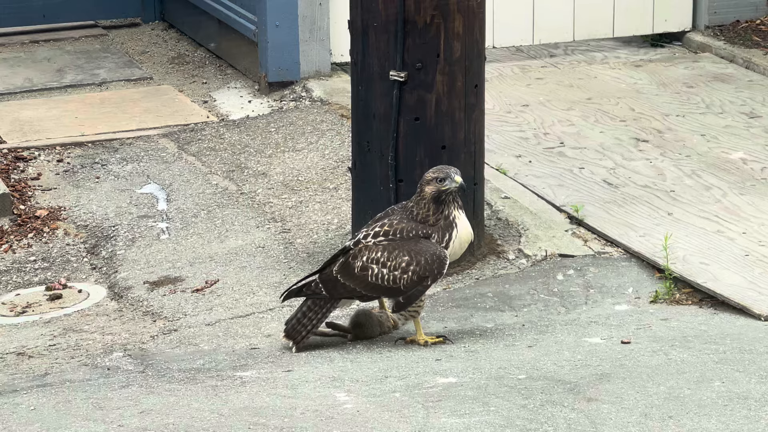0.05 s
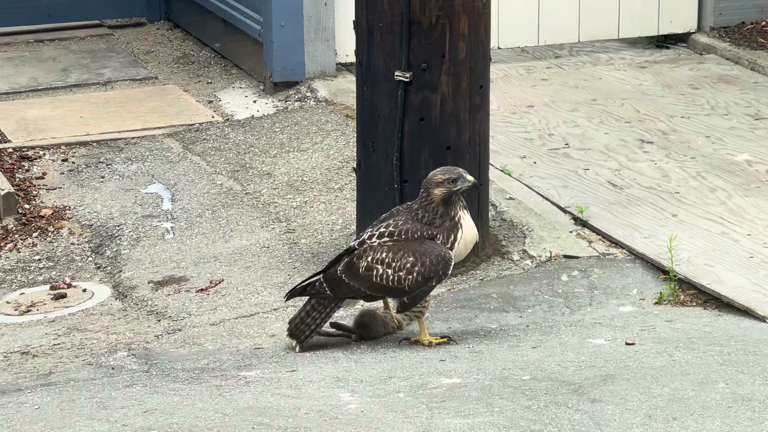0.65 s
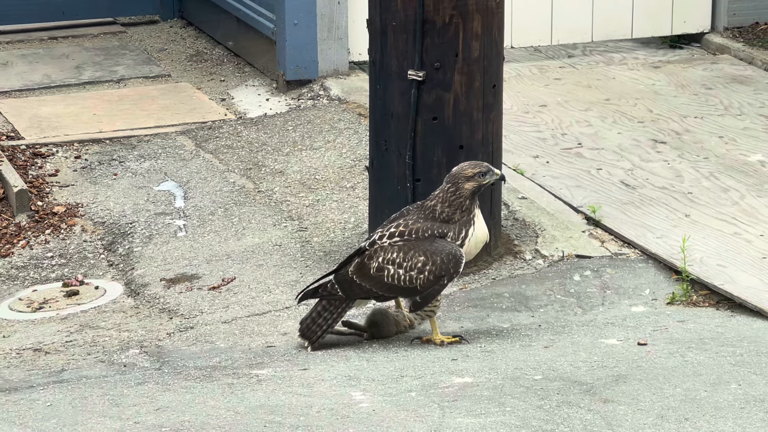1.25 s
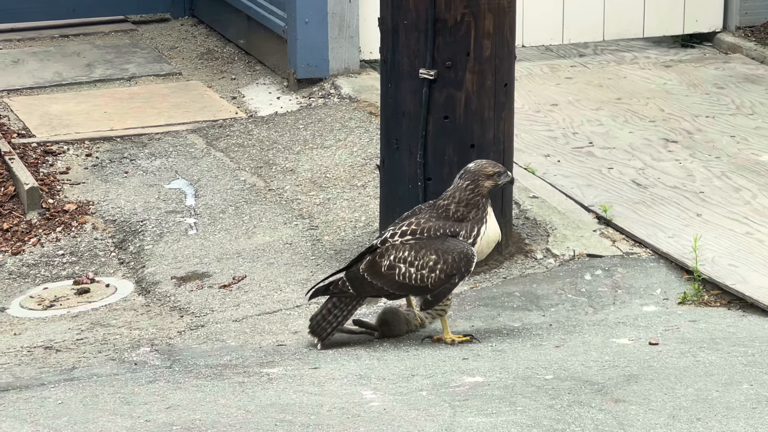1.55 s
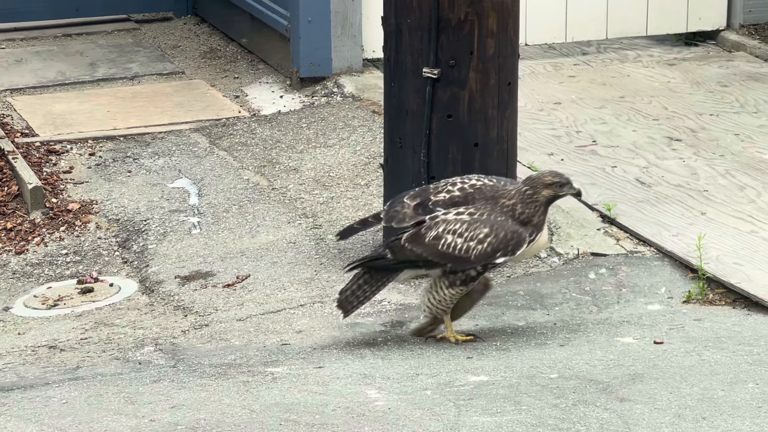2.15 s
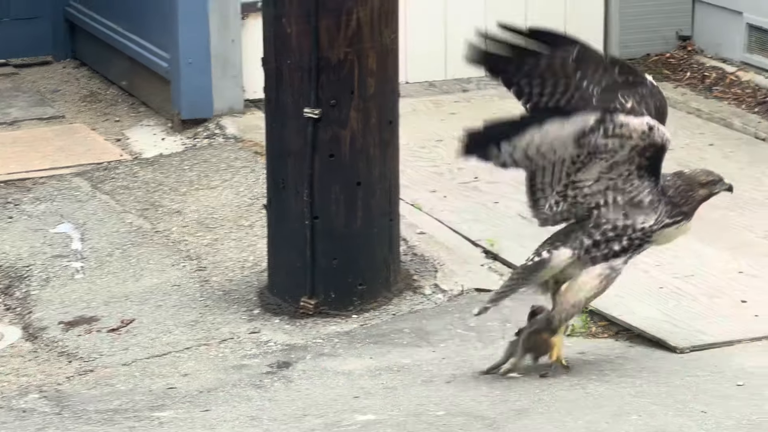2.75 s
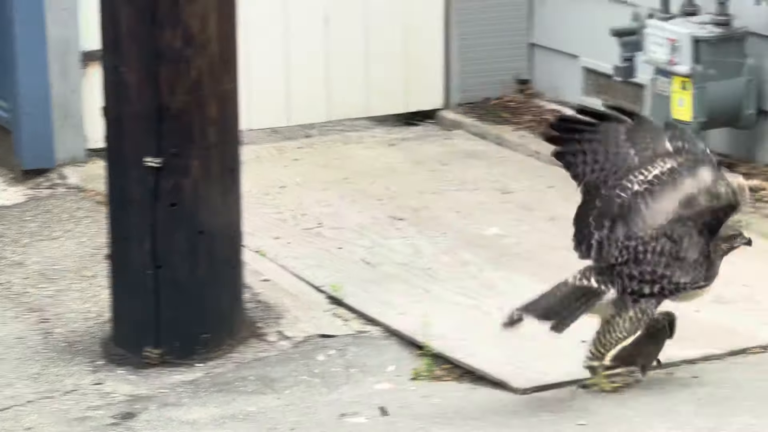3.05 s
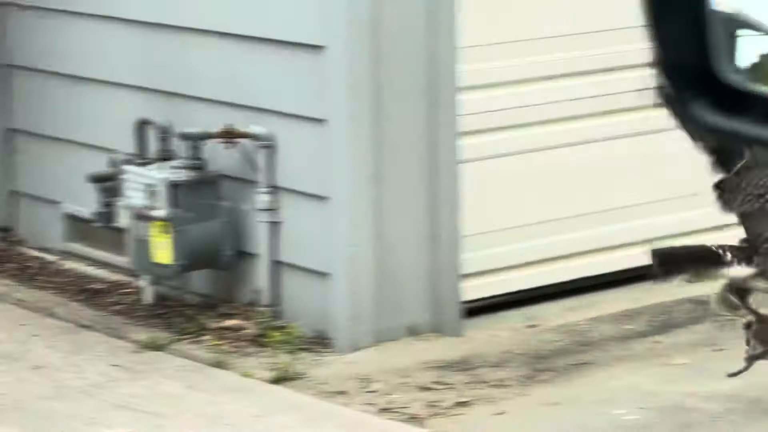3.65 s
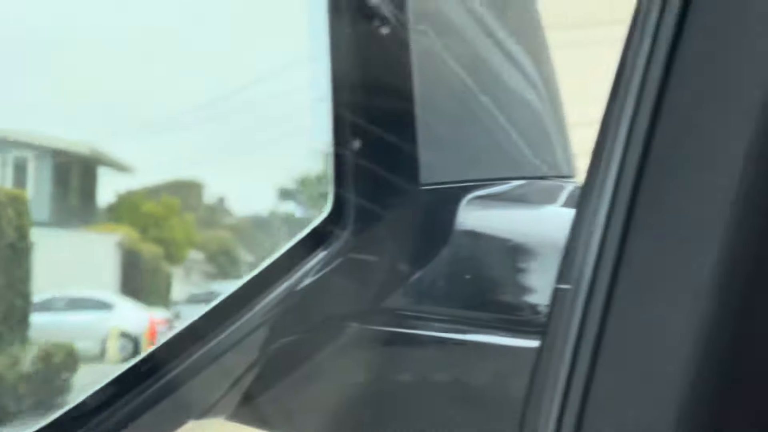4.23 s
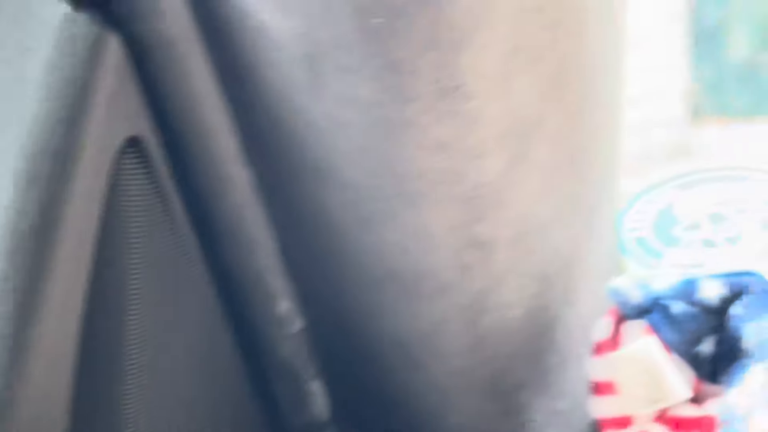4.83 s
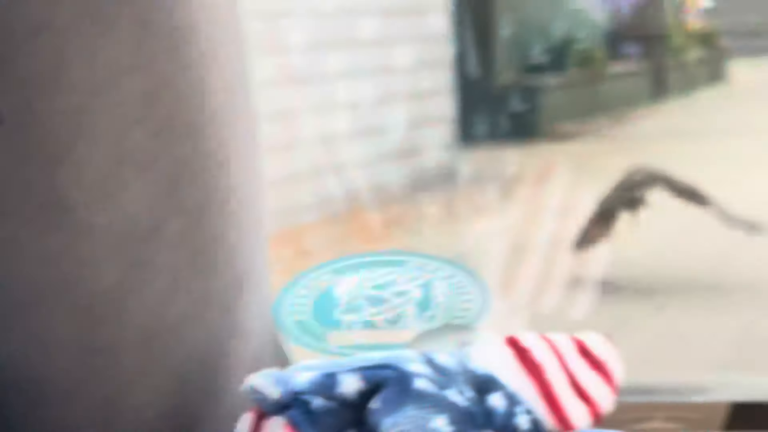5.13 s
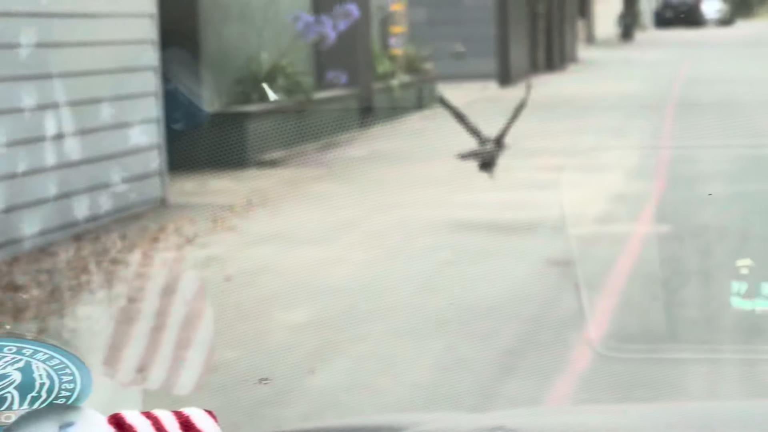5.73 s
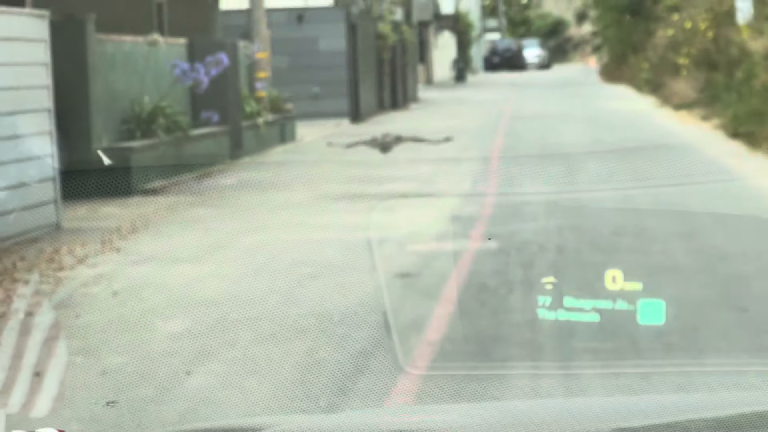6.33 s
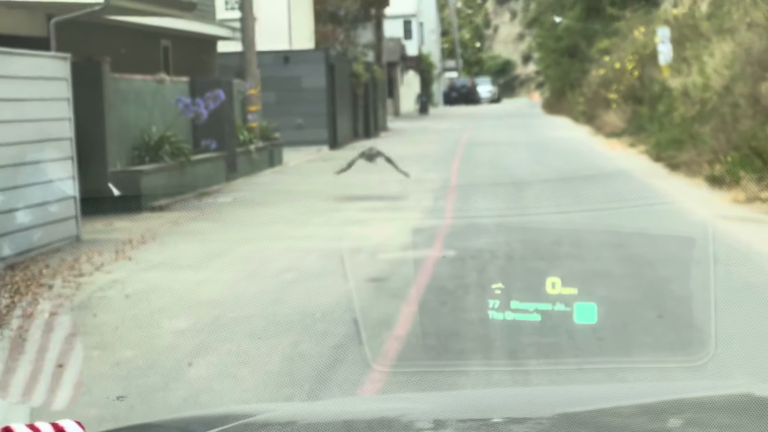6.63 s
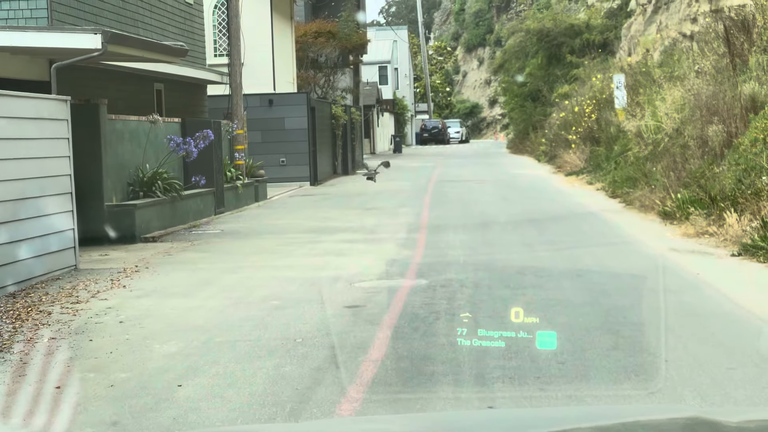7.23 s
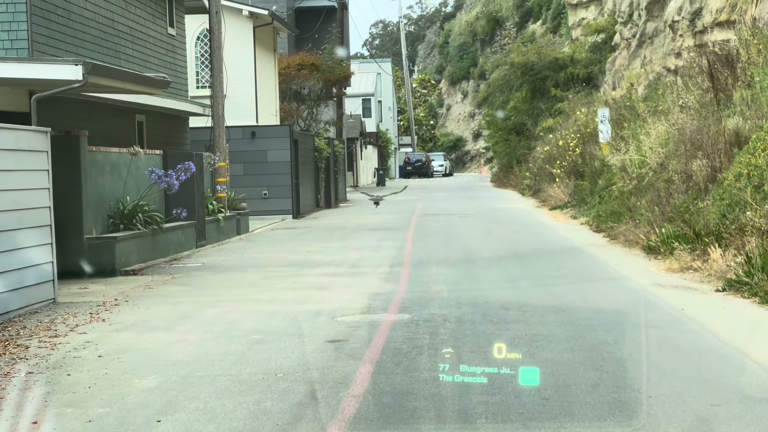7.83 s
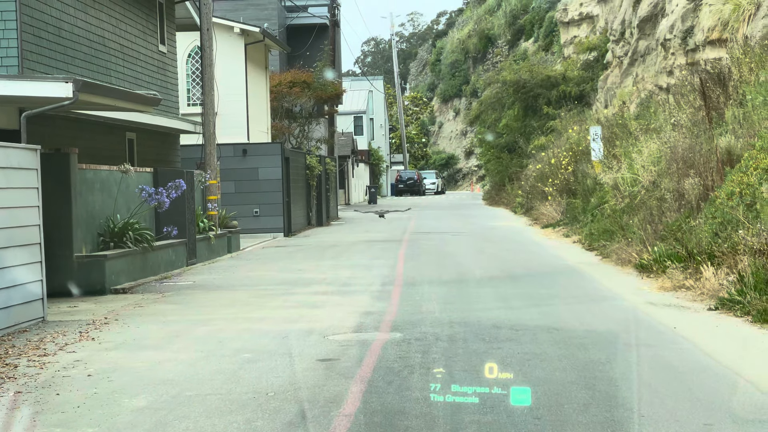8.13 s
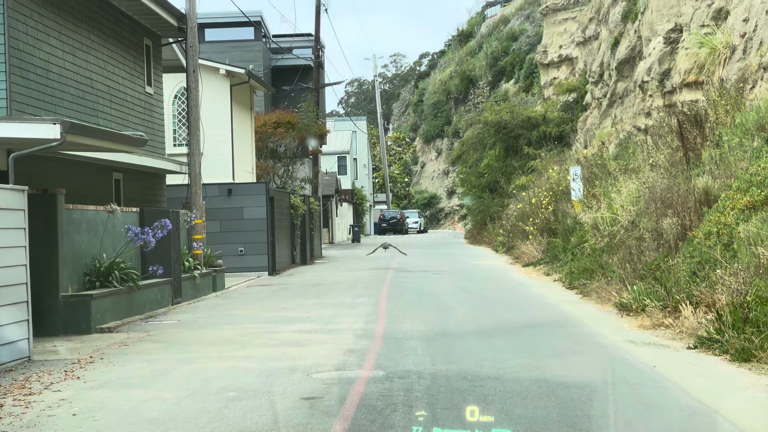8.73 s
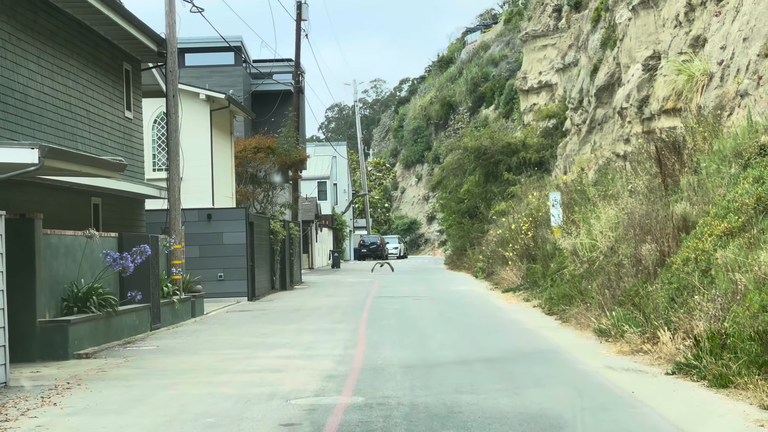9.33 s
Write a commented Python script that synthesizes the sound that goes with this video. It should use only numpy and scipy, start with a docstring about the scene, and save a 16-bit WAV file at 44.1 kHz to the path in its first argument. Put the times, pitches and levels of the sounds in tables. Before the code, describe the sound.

Heard from a phone at an open car window, the engine idles with a deep throb, along with a light fan whir, small ticks and very faint chirps in the street. The throb eases and a hawk takes off, barely audible. Fingers knock and rub on the phone and cloth slides along the door as it moves inside, where street air gives way to an even rush of ventilation and a subdued rumble.

```python
"""Idling car, street to cabin

An eight-cylinder car idles in a quiet lane. A phone at the open side window is drawn inside and
turned to the windscreen. Uneven firings ring the exhaust, louder outside; street air gives way to
ventilation. Faint ticks, chirps and the wings of a hawk taking off come from the street. As the
phone moves, fingers knock and rub on its case and a sleeve slides along the door."""
import sys
import numpy as np
from scipy import signal
from scipy.fft import rfft, irfft, next_fast_len
from scipy.io import wavfile
from scipy.ndimage import uniform_filter1d, map_coordinates

SR = 44100
rng = np.random.default_rng(int(sys.argv[2]) if len(sys.argv) > 2 else 0)


def wrap_up_sound(samples):
    """Save the sound to the file named by the first command line argument, as 16-bit audio."""
    columns = np.atleast_2d(samples).T
    # keep every value between -1 and 1, then stretch to whole-number steps
    tamed = np.clip(columns, -1, 1)
    steps = np.round(tamed * 32767).astype(np.int16)
    wavfile.write(sys.argv[1], SR, steps)


N = 418068

# Phone path. Each row: time in seconds, share inside (0 street, 0.5 window opening, 1 cabin).
PHONE_PATH = [(2.45, 0), (2.9, 0.02), (3.6, 0.26), (4.3, 0.89), (5.6, 0.94), (9.48, 1)]
# Stereo image of the noise. Each row: frequency in Hz, left-right correlation.
CORRELATION = [(60, 0.97), (160, 0.94), (300, 0.93), (600, 0.62), (1100, .52), (2100, 1), (3200, 0.8),
               (5500, 1), (12000, 0.93)]
# Noise spectra. Each row: frequency in Hz, relative level in dB.
STREET_SPECTRUM = [(190, -28), (330, -10), (362, -10), (509, -2), (580, -6.5), (691, -8), (758, -4.5),
                   (823, -12.5), (895, -11), (1190, -27.5), (1260, -18.5), (1540, -29), (3000, -47),
                   (3900, -74), (6600, -120)]
CABIN_SPECTRUM = [(190, -34), (330, -6.5), (471, -8), (541, -0.5), (597, -1), (803, -7), (913, -14),
                  (998, -13), (1170, -19.5), (1380, -19), (1510, -24.5), (2070, -32), (3500, -54),
                  (4550, -74), (7700, -120)]
HISS_SPECTRUM = [(1200, -28), (2500, 3.5), (5000, 0), (7000, 2), (9000, 0.5), (10300, 8), (12000, 1),
                 (13000, -16)]
FEATHER_SPECTRUM = [(1800, -12), (3000, -6), (4200, -1), (5500, -4), (9000, -3)]
SLEEVE_SPECTRUM = [(700, -7), (1500, 7.5), (2300, 7.5), (3400, 3), (4500, 1), (6000, -1.5), (9000, 2.5),
                   (11500, 1), (12800, -27)]
SEAT_SPECTRUM = [(1200, 1), (1800, -1.5), (2500, -4.5), (3300, -13), (6000, -17)]
RUMBLE_SPECTRUM = [(8.8, -46.5), (15, -15), (71, 5), (82, 2.5), (122, -6), (152, -3.5), (184, -15.5),
                   (220, -23.5), (290, -52), (480, -120)]
BURBLE_SPECTRUM = [(100, -37), (160, -0.5), (220, -1.5), (310, -3), (400, -15.5), (600, -17), (1200, -42.5)]
# Levels by phone position. Each holds: level outside, gain inside, gain in the opening, all in dB.
AIR_LEVELS_DB = (-62.5, 0.33, 2.25)
HISS_LEVELS_DB = (-87.5, 0.5, 5.5)
# Whines of the electrics. Each row: frequency in Hz, level in dB.
WHINE_TONES = [(6961, -105), (8786, -106), (9157, -107), (9523, -109), (11208, -109)]
# Bird calls. Each row: start and length in seconds, first and last pitch in Hz, level in dB.
BIRD_CHIRPS = [(0.086, 0.051, 4120, 3630, -86), (0.12, 0.046, 3990, 4280, -87),
               (1.026, 0.064, 2770, 2620, -86), (1.725, .05, 4000, 3990, -86),
               (1.773, 0.13, 2800, 2550, -87), (1.989, 0.031, 3800, 3650, -88),
               (6.097, 0.049, 3050, 3250, -86)]
# Street ticks. Each row: start in seconds, level in dB, centre of the excited range in Hz,
# its width in octaves, T60 in seconds, relative crack level in dB.
STREET_TICKS = [(0.603, -73, 3700, 0.45, 0.033, -12), (.644, -70, 3900, .35, 0.034, -12),
                (.801, -59, 1800, .6, 0.11, -20), (.871, -58.5, 2940, 0.95, 0.039, -5.5),
                (.895, -76, 7500, .8, .03, -3), (.949, -63, 2700, 0.76, 0.049, -2.5),
                (0.967, -67, 3400, 0.74, 0.04, -8), (.984, -79, 4030, .5, .03, -8),
                (1.279, -64.5, 8920, .6, 0.026, -6.5), (1.308, -70, 9200, .5, .018, -4),
                (1.38, -75.5, 2011, .6, 0.22, -15), (1.411, -70.5, 7790, 0.32, 0.025, -5),
                (1.682, -74, 12000, .3, .02, -10), (1.859, -70, 2103, 0.74, 0.08, -12),
                (1.873, -52.5, 1750, 0.83, 0.063, -19), (1.897, -70, 1750, .8, 0.07, -18)]
# Resonances of the ticks. Each row: frequency in Hz, relative level in dB.
TICK_RESONANCES = [(1560, 4), (1830, -0.5), (2280, -4), (2800, -13), (3450, -9), (4150, -3), (6900, -9),
                   (8100, -5), (9350, 1), (11500, -8)]
# Smooth swells. Each row: start in seconds, length in seconds, level in dB.
WING_BEATS = [(2.81, 0.22, -86), (3.1, 0.13, -88)]
SLEEVE_SQUEAKS = [(3.55, 0.2, -86), (4.68, 0.34, -86)]
SEAT_SHIFTS = [(5.42, 0.49, -77.5), (5.855, 0.21, -78.5), (6.12, 0.21, -81), (7.09, 0.12, -92),
               (7.97, 0.1, -83), (8.2, 0.41, -87)]
HAND_BUMPS = [(2.98, 0.13, -47.5), (3.61, 0.18, -49.5), (4.01, .1, -48.5), (4.285, 0.077, -47),
              (8.22, 0.11, -54.5)]
# Sleeve on the door. Each row: start, rise, hold and release in seconds, level and treble lift in dB.
SLEEVE_STROKES = [(3.535, .045, 0.06, 0.12, -76.5, 5.5), (3.64, 0.2, 0.17, 0.55, -75.5, -0.5),
                  (4.55, 0.4, .28, .1, -72, -0.5), (4.98, 0.055, 0.02, 0.18, -83, 4.5)]
# Fingers rubbing the case. Each row: start in seconds, length in seconds, level in dB.
FINGER_RUBS = [(3.158, 0.024, -53), (3.646, 0.064, -48.5), (3.659, 0.014, -50.5), (4.808, 0.054, -51),
               (4.875, 0.068, -51.5), (5.503, 0.038, -49.5)]
# Knocks on the case. Each row: start in seconds, level in dB, pitch in Hz, pitch overshoot as a share.
FINGER_KNOCKS = [(3.1528, -33.5, 540, 0.2), (3.664, -42, 700, 0.3), (3.8935, -44, 300, 0.4),
                 (4.270, -42, 560, 0.2), (4.3547, -28, 584, 0.76), (5.524, -45, 800, 0.4),
                 (5.5443, -31, 470, 0.55), (6.005, -45, 620, 0.4)]
# Resonances of the gripped case, and of the exhaust and car body.
# Each row: frequency in Hz, relative level in dB, T60 in seconds.
CASE_MODES = [(300, -10, 0.014), (520, -2, 0.016), (630, 0, 0.018), (770, -5, 0.012), (960, -13, 0.01)]
EXHAUST_MODES = [(34.8, -20.5, 0.15), (48, -9.5, 0.39), (69.4, 2, 0.14), (103.4, -9.5, 0.16),
                 (145, -18, 0.052)]
# One engine cycle. Each entry: firing strength in dB. Two thump where one bank fires twice running.
FIRINGS_DB = [-11, 0.5, -8.5, -6.5, -2.5, -9.5, 1, -19]
# Engine rumble envelope. Each row: time in seconds, level in dB.
RUMBLE_ENVELOPE = [(0, -42.5), (.8, -44.5), (1.22, -41), (1.39, -49.5), (1.95, -51.5), (2.08, -46.5),
                   (2.33, -46), (2.41, -57), (5.7, -55), (7.5, -57.5), (8.8, -60.5), (9.48, -56.5)]


def amp(db):
    """Decibels to gain."""
    return 10 ** (np.asarray(db) / 20)


def unit(x):
    """Scale to rms 1."""
    return x / np.sqrt(np.mean(x ** 2) + 1e-20)


def sine(hz):
    """Sine of peak 1 from a per-sample frequency."""
    return np.sin(2 * np.pi * np.cumsum(hz) / SR)


def over_hz(rows, hz):
    """Interpolate (Hz, value) rows on a log axis."""
    knots_hz, values = np.transpose(rows)
    return np.interp(np.log(hz + 1), np.log(knots_hz + 1), values)


def over_time(rows):
    """Interpolate (seconds, value) rows per sample."""
    return np.interp(np.arange(N) / SR, *np.transpose(rows))


def wobble(rate_hz):
    """Smooth random curve through Gaussian knots."""
    knots = rng.standard_normal(int(N * rate_hz / SR) + 4)
    coarse = np.arange(0, N, 32)
    return np.interp(np.arange(N), coarse, map_coordinates(knots, [coarse * rate_hz / SR]))


def add(track, start_s, sound):
    """Mix a sound into a track."""
    part = track[max(round(start_s * SR), 0):][:len(sound)]
    part += sound[:len(part)]


def swells(rows):
    """Gain curve, one Hann swell per row."""
    gain = np.zeros(N)
    for start_s, length_s, db in rows:
        add(gain, start_s, amp(db) * np.hanning(round(length_s * SR)))
    return gain


def filtered(x, response):
    """Apply a frequency response by FFT."""
    size = next_fast_len(N + 8192)
    return irfft(rfft(x, size) * response(np.fft.rfftfreq(size, 1 / SR)), size)[..., :N]


def stereo_noise(gain):
    """Partly correlated noise pair, rms 1, shaped by gain(hz)."""
    def mid_side(hz):
        angle = np.arccos(np.clip(over_hz(CORRELATION, hz), -1, 1)) / 2
        return gain(hz) * np.array([np.cos(angle), np.sin(angle)])
    mid, side = filtered(rng.standard_normal((2, N)), mid_side)
    return unit(np.array([mid + side, mid - side]))


def coloured(spectrum, patchy_db):
    """Stereo noise, rms 1, steep beyond the spectrum's ends, with drifting patches of gain."""
    def gain(hz):
        skirts = np.minimum(hz / spectrum[0][0], 1) ** 2 / np.maximum(hz / spectrum[-1][0], 1) ** 4
        return amp(over_hz(spectrum, hz)) * skirts
    pair = stereo_noise(gain)
    if not patchy_db:
        return pair
    frames = signal.stft(pair, nperseg=512)[2]
    patches = uniform_filter1d(rng.standard_normal(frames.shape[1:]), size=4, axis=0)
    patches = unit(uniform_filter1d(patches, size=9, axis=1))
    return unit(signal.istft(frames * amp(patchy_db * patches), nperseg=512)[1][:, :N])


def narrow(centre_hz, half_width_hz):
    """Stereo noise in one resonance."""
    return stereo_noise(lambda hz: 1 / (1 + ((hz - centre_hz) / half_width_hz) ** 2))


def phone_position():
    """Share inside the car and nearness to the window opening, both 0-1."""
    inside = np.clip(over_time(PHONE_PATH), 0, 1)
    return inside, 2 * np.sqrt(inside * (1 - inside))


def air(inside, opening):
    """Street air crossfades to ventilation under a thin hiss; both peak in the window opening."""
    def level_db(outside_db, inside_db, opening_db):
        return outside_db + inside_db * inside + opening_db * opening
    street = np.sqrt(1 - inside) * coloured(STREET_SPECTRUM, patchy_db=2.0)
    cabin = np.sqrt(inside) * coloured(CABIN_SPECTRUM, patchy_db=1.8)
    flow_db = level_db(*AIR_LEVELS_DB) + 0.37 * wobble(6.9) + 0.59 * wobble(70)
    hiss = amp(level_db(*HISS_LEVELS_DB)) * coloured(HISS_SPECTRUM, patchy_db=1.0)
    return amp(flow_db) * (street + cabin) + hiss


def electrics():
    """The car's electrics whine: faint, slightly unsteady high tones."""
    return sum(amp(db + 1.7 * wobble(2.7)) * np.sqrt(2) * sine(hz + 2.5 * wobble(8))
               for hz, db in WHINE_TONES)


def radiator_fan(inside, blade_hz=750, outside_db=-69):
    """Wavering blade tone and three noise bands, heard outside."""
    blade = np.sqrt(2) * sine(blade_hz * (1 + 0.005 * wobble(12)))
    blade *= amp(-1 + 1.4 * wobble(3.3))
    whir = amp(-12) * narrow(blade_hz, 16) + amp(-16) * narrow(1290, 31) + amp(-19) * narrow(1545, 40)
    return amp(outside_db) * (1 - inside) * (blade + whir)


def vent(inside, level_db=-79):
    """An air vent whistles, heard only well inside."""
    return amp(level_db) * inside ** 5 * narrow(1384, 50)


def window_hollow(opening, level_db=-65.5):
    """Hollow resonance of the window opening."""
    return amp(level_db) * opening * narrow(614, 65)


def birds(warble_share=0.015):
    """Distant chirps: short, gliding, warbling whistles."""
    track = np.zeros(N)
    for start_s, length_s, first_hz, last_hz, db in BIRD_CHIRPS:
        n = round(length_s * SR)
        pitch_hz = np.linspace(first_hz, last_hz, n) * (1 + warble_share * wobble(400)[:n])
        add(track, start_s, amp(db) * np.hanning(n) * sine(pitch_hz))
    return track


def hawk():
    """Take-off: one swell of feather noise per wing beat."""
    return swells(WING_BEATS) * coloured(FEATHER_SPECTRUM, patchy_db=5)[0]


def ticks(crack_t60_s=0.027, rise_s=0.0014, rattle_db=3, detune_share=0.04):
    """Small dry contacts ring clusters of close modes, which rattle as they die under a brief crack."""
    t = np.arange(SR // 5) / SR
    track = np.zeros(N)
    mode_hz, mode_db = np.repeat(TICK_RESONANCES, 5, axis=0).T[:, :, None]
    for start_s, db, centre_hz, width_octaves, t60_s, crack_db in STREET_TICKS:
        detune, phase = rng.standard_normal((2, len(mode_hz), 1))
        detuned_hz = mode_hz * np.exp(detune_share * detune)
        weight = amp(mode_db) * np.exp(-(np.log2(mode_hz / centre_hz) / width_octaves) ** 2)
        ring = unit((weight * np.sin(2 * np.pi * (detuned_hz * t + phase))).sum(axis=0))
        crack = amp(crack_db - 60 * t / crack_t60_s) * rng.standard_normal(len(t))
        tick = (ring * amp(-60 * t / t60_s) + crack) * (1 - np.exp(-t / rise_s))
        add(track, start_s, amp(db) * tick / np.abs(tick).max())
    return track * amp(rattle_db * wobble(160))


def lane_reverb(x, t60_s=0.16, wet_db=-8):
    """House walls add a short tail."""
    t = np.arange(SR // 2) / SR
    tail = rng.standard_normal(len(t)) * amp(-60 * t / t60_s)
    return x + amp(wet_db) * signal.fftconvolve(x, tail / np.linalg.norm(tail))[:N]


def clothing(grip_db=1.1, treble_hz=4200, squeak_hz=4800):
    """A sleeve drags with uneven grip and thin squeaks, brighter when quick; cloth shifts on the seat."""
    t = np.arange(N) / SR
    cloth = amp(grip_db * wobble(22)) * coloured(SLEEVE_SPECTRUM, patchy_db=2.0)
    treble = filtered(cloth, lambda hz: 1 - 1 / (1 + (hz / treble_hz) ** 4))
    strokes = np.zeros((2, N))
    for start_s, rise_s, hold_s, release_s, db, lift_db in SLEEVE_STROKES:
        envelope = np.interp(t, start_s + np.cumsum([0, rise_s, hold_s, release_s]), [0, 1, 1, 0])
        strokes += amp(db) * envelope * (cloth + (amp(lift_db) - 1) * treble)
    seat = swells(SEAT_SHIFTS) * amp(grip_db * wobble(35)) * coloured(SEAT_SPECTRUM, patchy_db=1.5)
    squeaks = swells(SLEEVE_SQUEAKS) * narrow(squeak_hz, 280)
    return strokes + squeaks + seat


def hand_bumps(thud_hz=78.2, wander_share=0.134):
    """The turning hand bumps the phone: low, dull thuds."""
    return swells(HAND_BUMPS) * np.sqrt(2) * sine(thud_hz * (1 + wander_share * wobble(45)))


def finger_rubs(slip_rate_hz=190, unevenness=0.35, scatter_db=0.5, edge_s=0.0027):
    """Skin sticks and slips at an uneven rate; each slip rings the hollow case."""
    t = np.arange(SR // 5) / SR
    grip, slips = np.zeros(N), np.zeros(N)
    for start_s, length_s, db in FINGER_RUBS:
        add(grip, start_s, amp(db) * np.clip(np.minimum(t, length_s - t + edge_s) / edge_s, 0, 1))
    gap, size = rng.standard_normal((int(2 * slip_rate_hz * N / SR), 2)).T
    onsets = (np.cumsum(np.exp(unevenness * gap)) * SR / slip_rate_hz).astype(int)
    slips[onsets[onsets < N]] = amp(scatter_db * size[onsets < N])
    ring = sum((-1) ** k * amp(db - 60 * t / t60_s) * np.cos(2 * np.pi * hz * t)
               for k, (hz, db, t60_s) in enumerate(CASE_MODES))
    band = lambda hz: 1 / (1 + (hz / 1100) ** 8) / (1 + (180 / (hz + 1)) ** 4)
    return grip * unit(filtered(signal.fftconvolve(slips, ring)[:N], band))


def finger_knocks(t60_s=0.006, rise_s=0.0015, settle_s=0.0012, thud_ratio=0.694, thud_rise_s=0.0024):
    """Each knock: a damped ring of the case, falling in pitch, over a slower, lower thud."""
    t = np.arange(SR // 5) / SR
    track = np.zeros(N)
    for start_s, db, hz, overshoot in FINGER_KNOCKS:
        ring = sine(hz * (1 + overshoot * np.exp(-t / settle_s))) * amp(-60 * t / t60_s)
        thud = np.sin(2 * np.pi * thud_ratio * hz * t) * amp(-8 - 30 * t / t60_s)
        knock = ring * (1 - np.exp(-(t / rise_s) ** 2)) + thud * (1 - np.exp(-(t / thud_rise_s) ** 2))
        add(track, start_s, amp(db) * knock / np.abs(knock).max())
    return track


def through_case(x, lag_s=0.00014, pan_db=1.0, cutoff_hz=1300):
    """The case carries contact sound to both ports, low-passed; the left is louder and later."""
    ports = np.array([[0.5], [-0.5]])
    delay = lambda hz: np.exp(-2j * np.pi * hz * lag_s * ports)
    return amp(pan_db * ports) * filtered(x, lambda hz: delay(hz) / (1 + (hz / cutoff_hz) ** 10))


def firing_train(cycle_hz=4.342, first_s=0.0012, jitter_s=0.0004, scatter_db=0.05):
    """One impulse per firing, eight unequal ones per four-stroke cycle."""
    firing_hz = cycle_hz * len(FIRINGS_DB)
    track = np.zeros(N)
    for k, (size, jitter) in enumerate(rng.standard_normal((int(N / SR * firing_hz), 2))):
        db = FIRINGS_DB[k % len(FIRINGS_DB)] - scatter_db * size
        add(track, first_s + k / firing_hz + jitter_s * jitter, amp([db]))
    return track


def engine(inside, accessory_hz=156.6, puff_s=0.024, burble_outside_db=-59.5, shield_db=6):
    """Firings ring the exhaust; their gas puffs modulate rumble and burble. An accessory hums."""
    firings = firing_train()
    t = np.arange(SR // 2) / SR
    ring = -sum(amp(db - 60 * t / t60_s) * np.sin(2 * np.pi * hz * t) for hz, db, t60_s in EXHAUST_MODES)
    band = lambda hz: 1 / (1 + (25 / (hz + 1)) ** 8) / (1 + (hz / 190) ** 6)
    beat = unit(filtered(signal.fftconvolve(firings, ring)[:N], band))
    puffs = unit(signal.fftconvolve(firings, np.hanning(round(puff_s * SR)))[:N])
    rumble = unit((1 + 0.17 * puffs) * coloured(RUMBLE_SPECTRUM, patchy_db=0))
    burble = unit((1 + 0.2 * puffs) * coloured(BURBLE_SPECTRUM, patchy_db=1.0))
    hum = amp(wobble(7.1)) * sine(accessory_hz + 1.3 * wobble(4))
    rumble_db = over_time(RUMBLE_ENVELOPE)
    burble_db = burble_outside_db + 0.47 * (rumble_db - rumble_db.mean()) - shield_db * inside
    return amp(rumble_db) * (amp(-2) * beat + rumble) + amp(burble_db) * burble + amp(-65) * hum


def scene():
    """Sum at the phone's two microphones."""
    inside, opening = phone_position()
    idle = engine(inside)
    background = air(inside, opening) + radiator_fan(inside) + vent(inside)
    background += window_hollow(opening) + electrics()
    handling = clothing() + through_case(finger_knocks() + finger_rubs()) + hand_bumps()
    street = lane_reverb(ticks() + birds() + hawk())
    return background + street + handling + idle


def record(dry, flip_hz=10250, flip_half_width_hz=1700, top_hz=12900):
    """The phone's channels fall out of phase in one treble band; all above top_hz is cut."""
    def response(hz):
        offset = np.clip((hz - flip_hz) / flip_half_width_hz, -1, 1)
        phase = np.pi / 2 * np.cos(np.pi / 2 * offset) ** 2
        return np.exp(1j * np.array([phase, -phase])) * (hz < top_hz)
    return filtered(dry, response)


dry = scene()
out = record(dry)
wrap_up_sound(out)
```